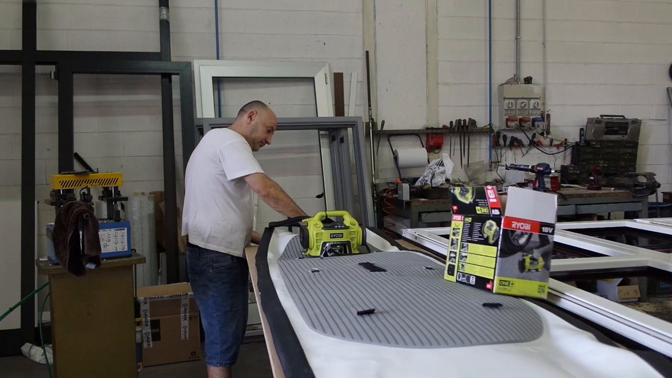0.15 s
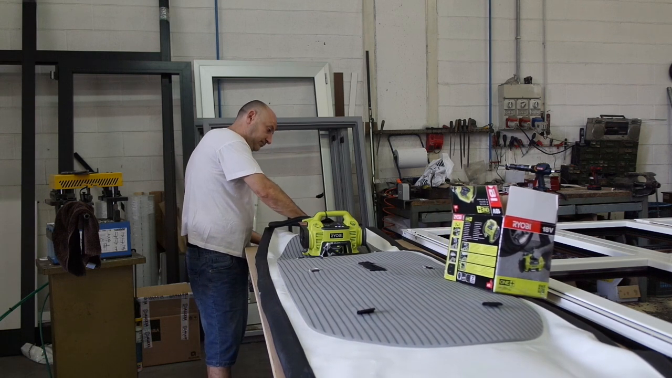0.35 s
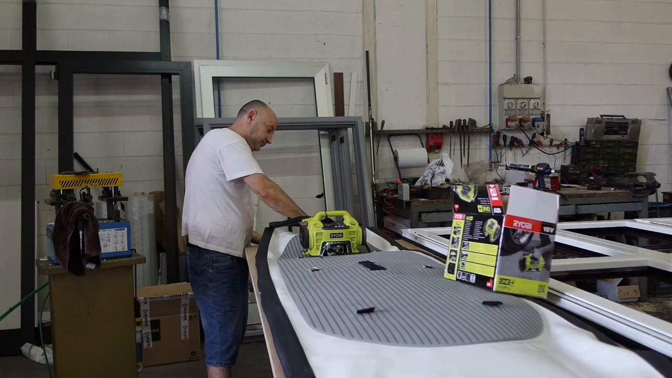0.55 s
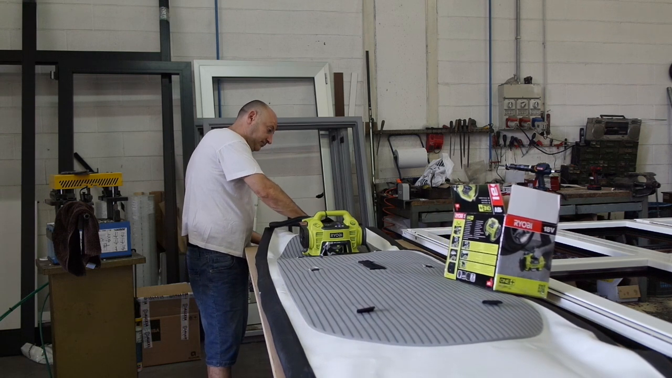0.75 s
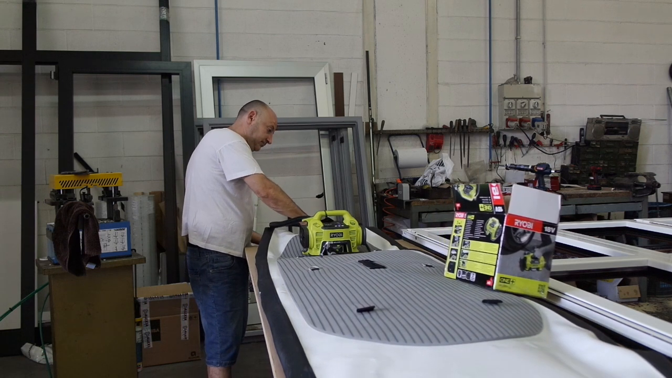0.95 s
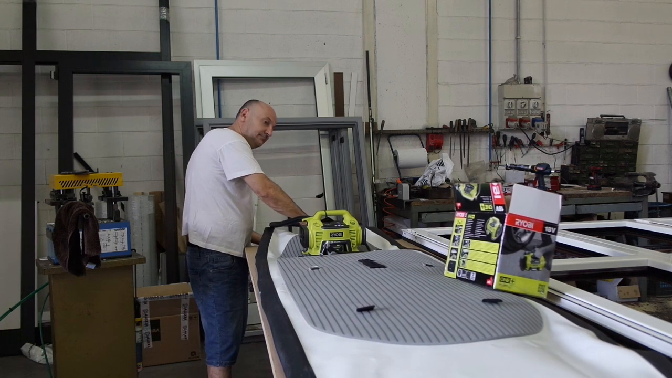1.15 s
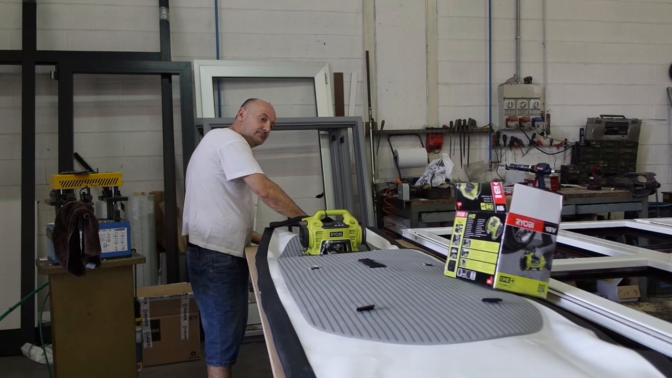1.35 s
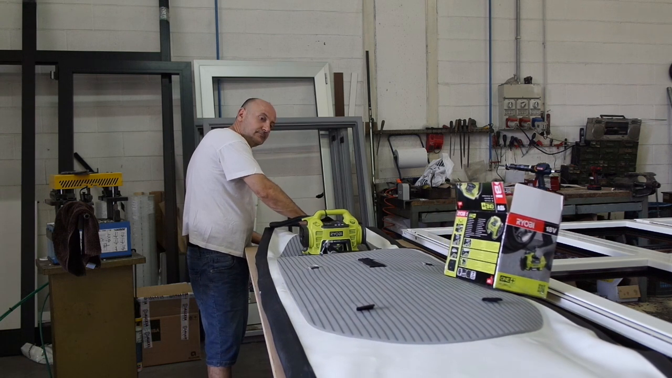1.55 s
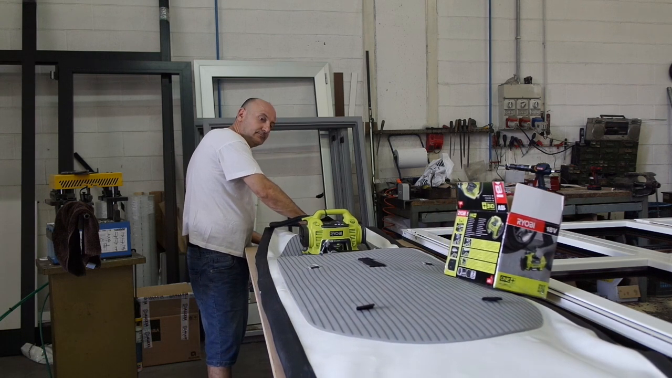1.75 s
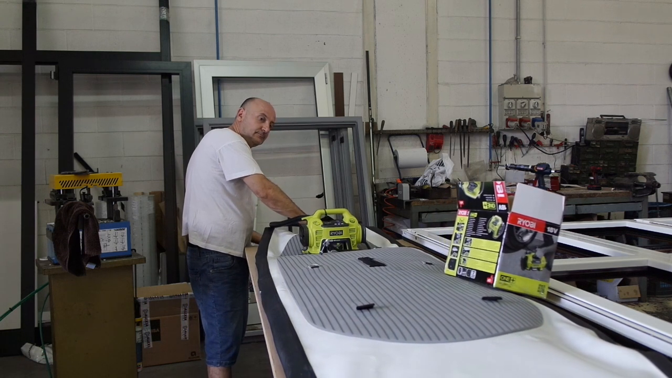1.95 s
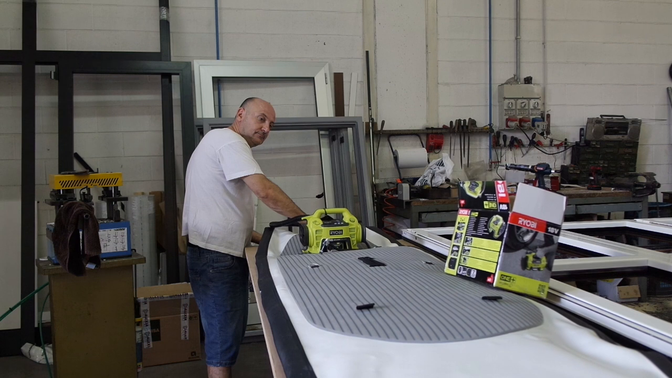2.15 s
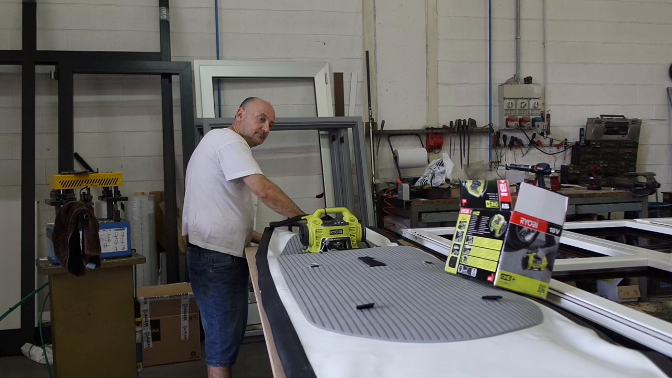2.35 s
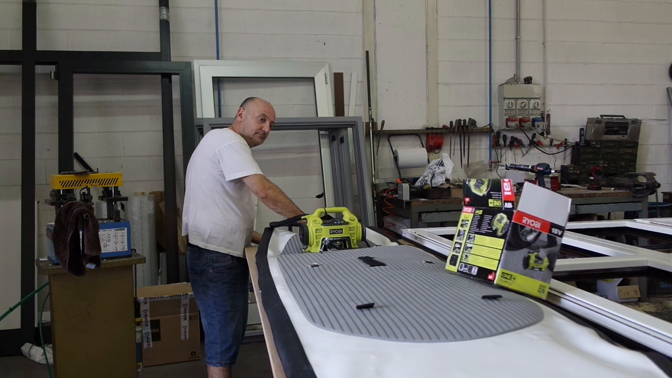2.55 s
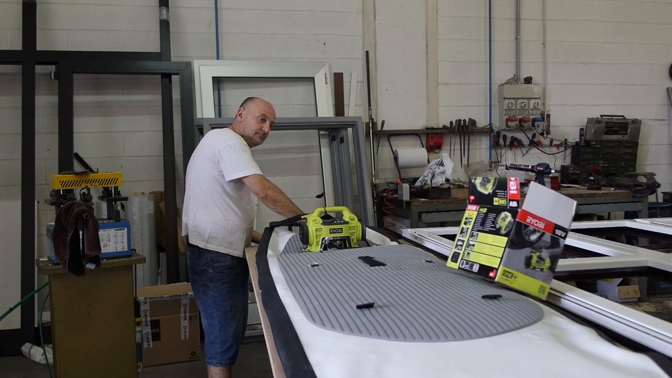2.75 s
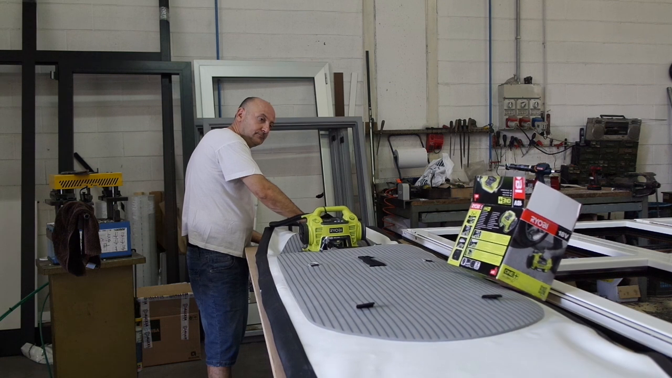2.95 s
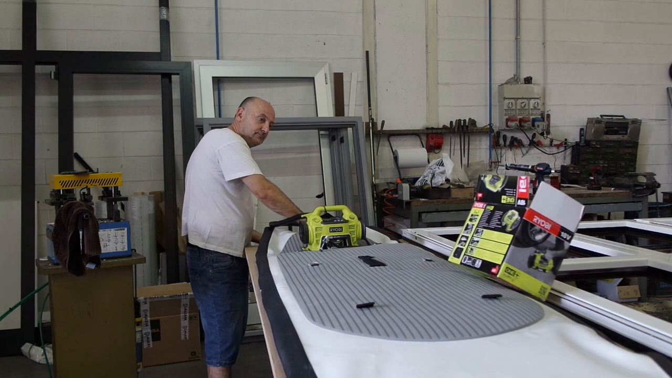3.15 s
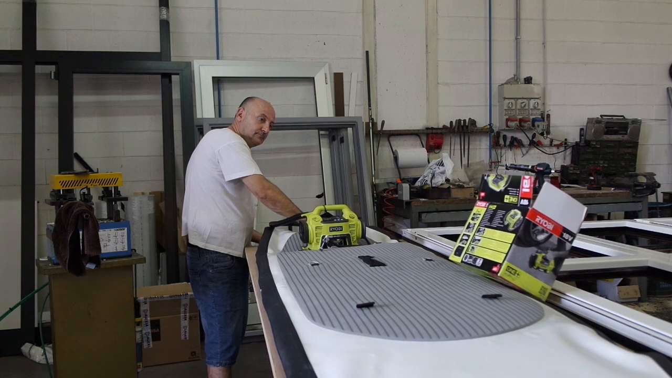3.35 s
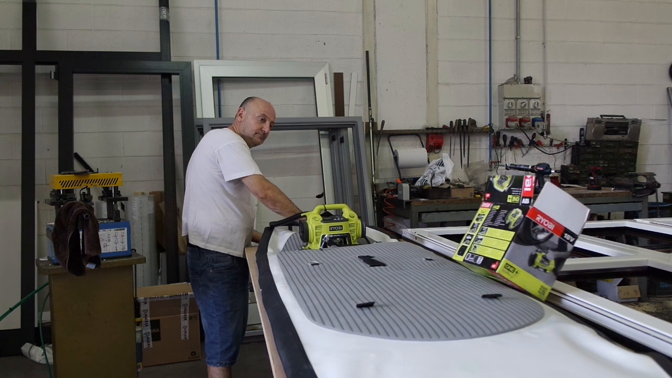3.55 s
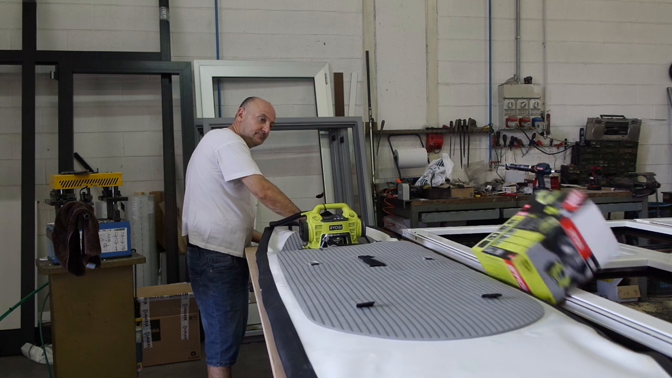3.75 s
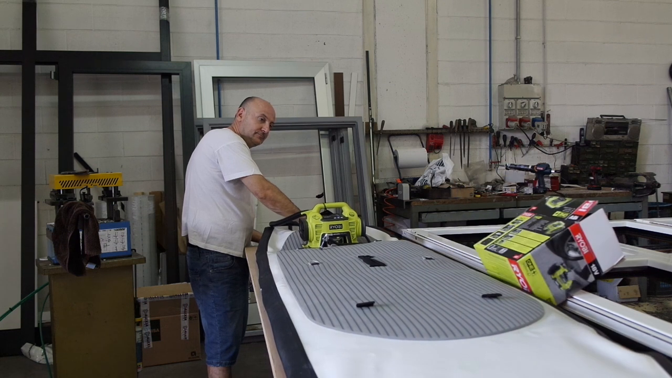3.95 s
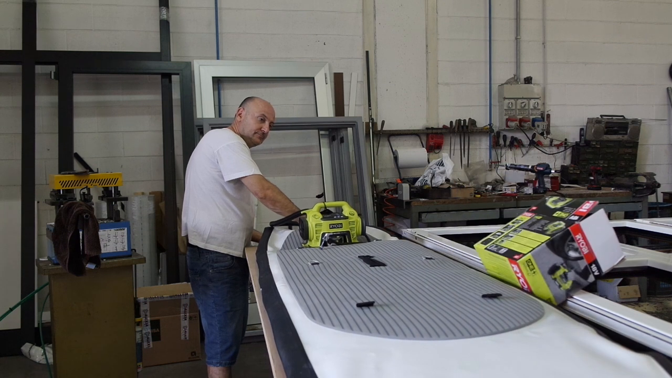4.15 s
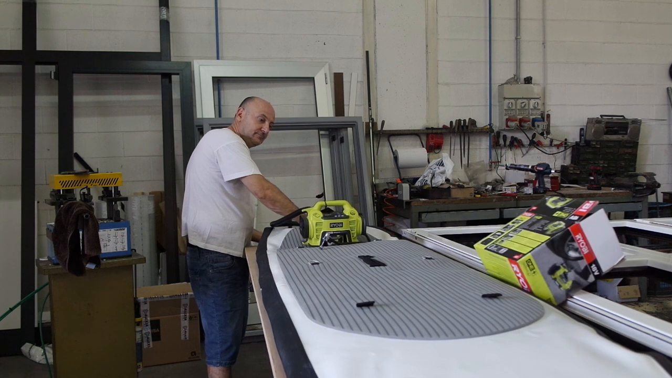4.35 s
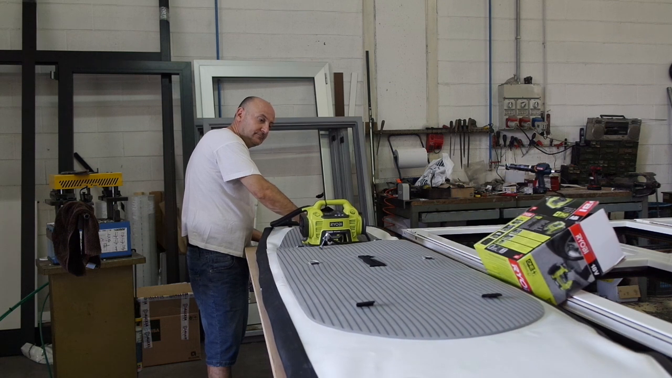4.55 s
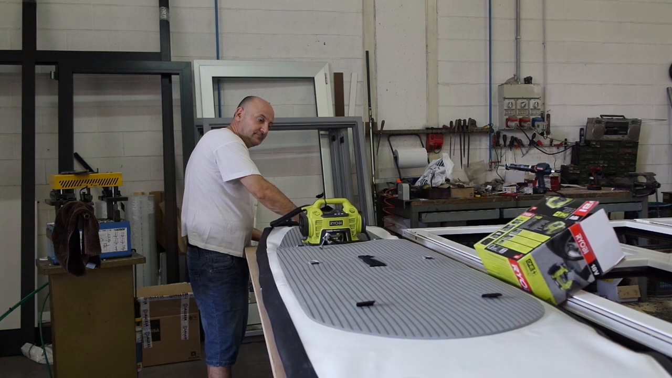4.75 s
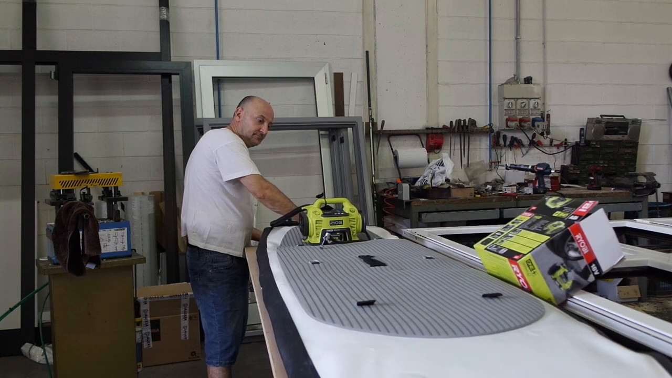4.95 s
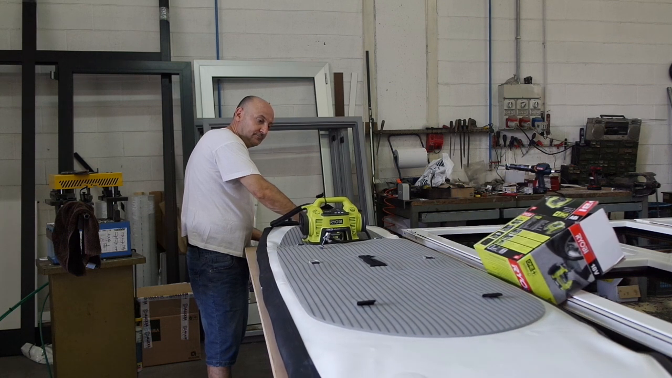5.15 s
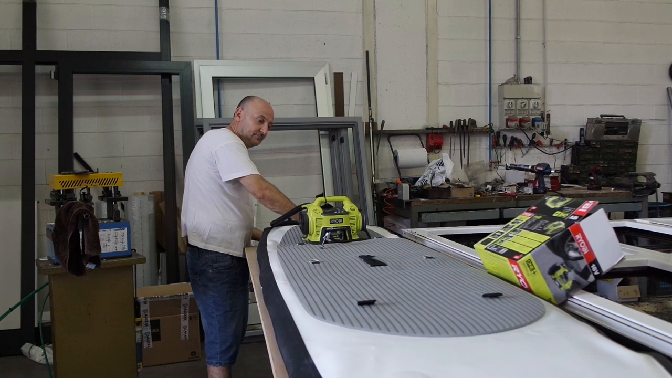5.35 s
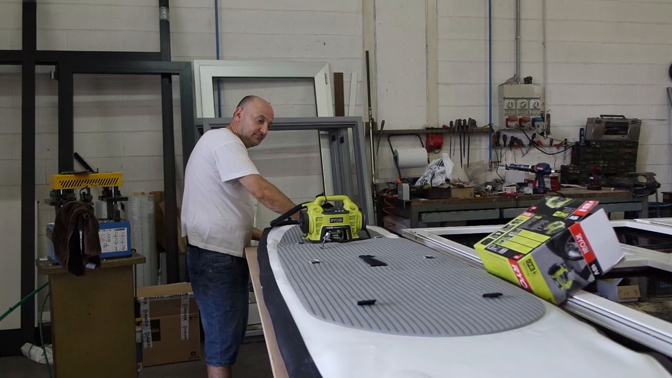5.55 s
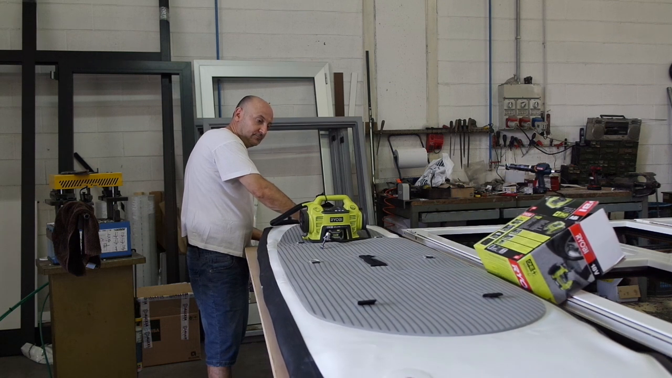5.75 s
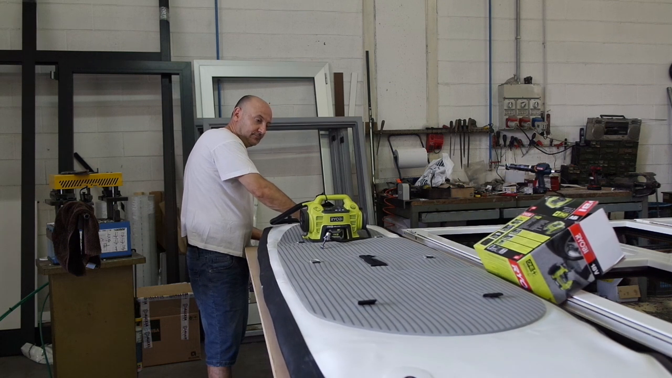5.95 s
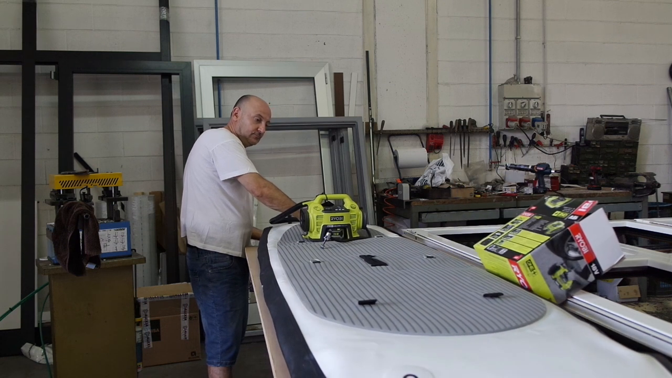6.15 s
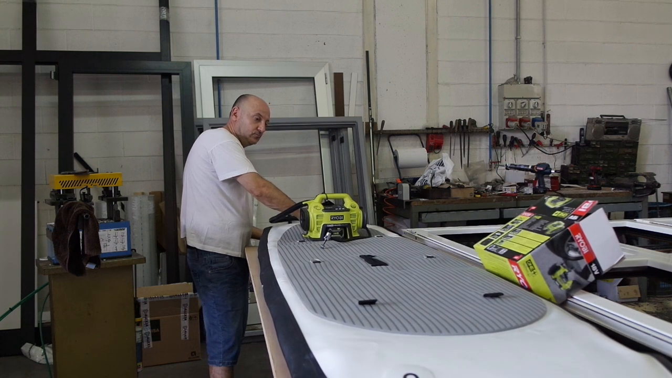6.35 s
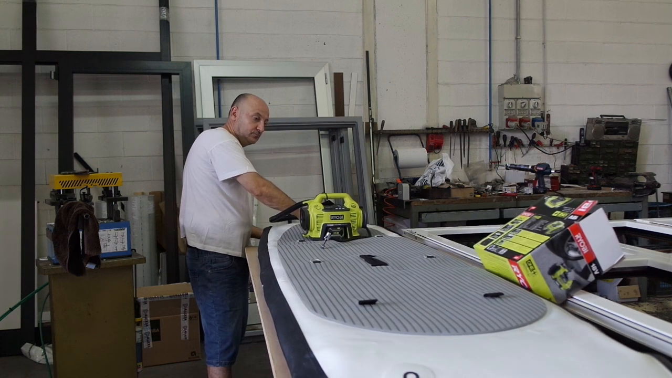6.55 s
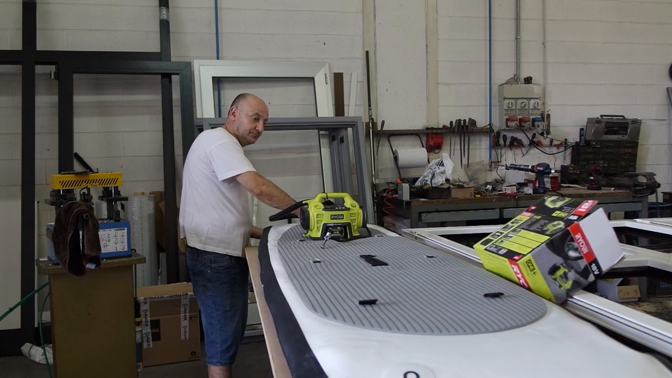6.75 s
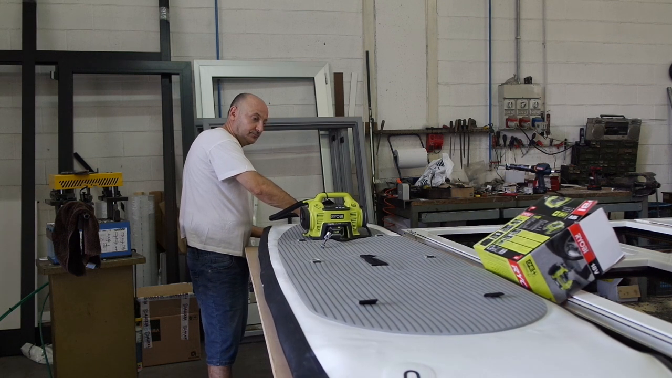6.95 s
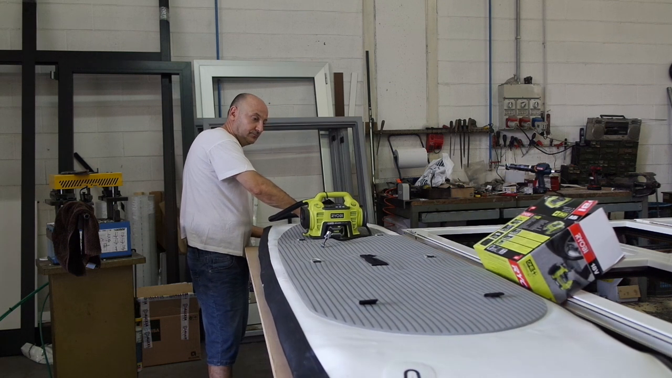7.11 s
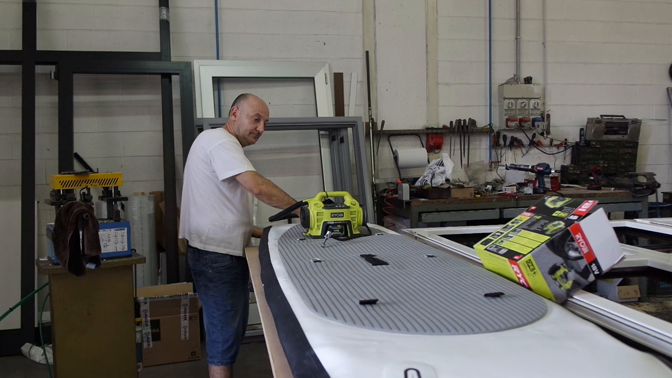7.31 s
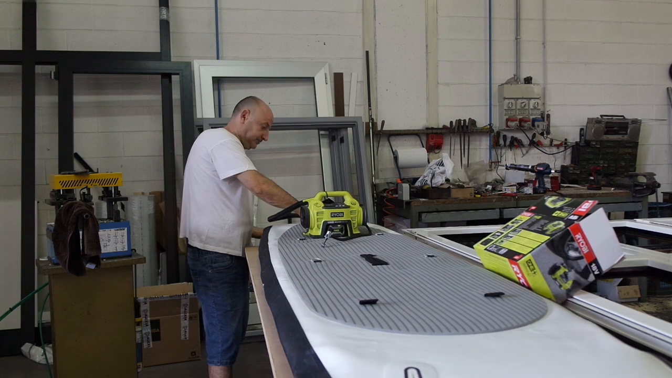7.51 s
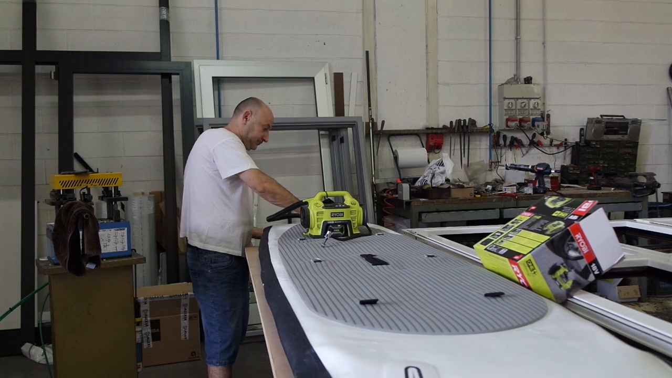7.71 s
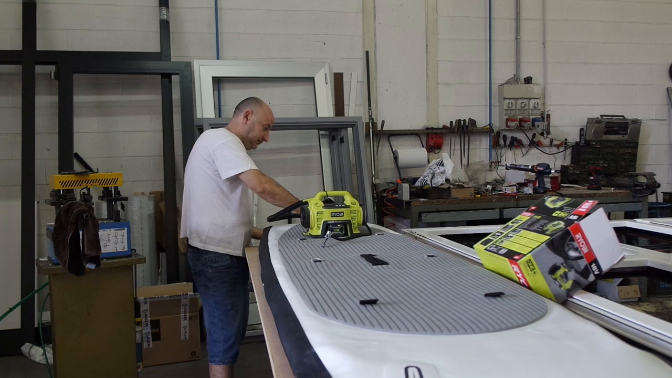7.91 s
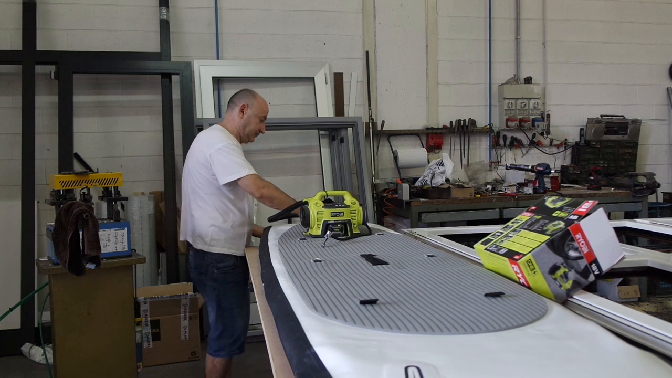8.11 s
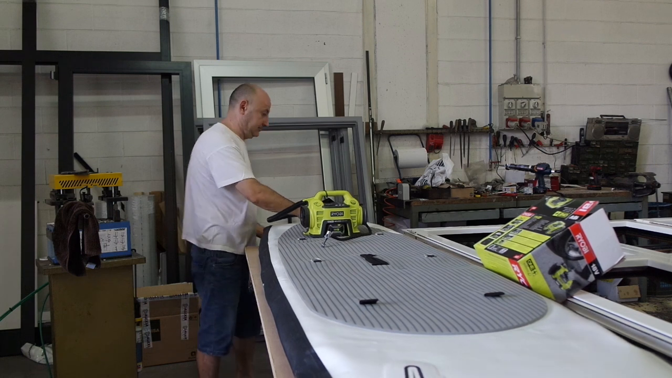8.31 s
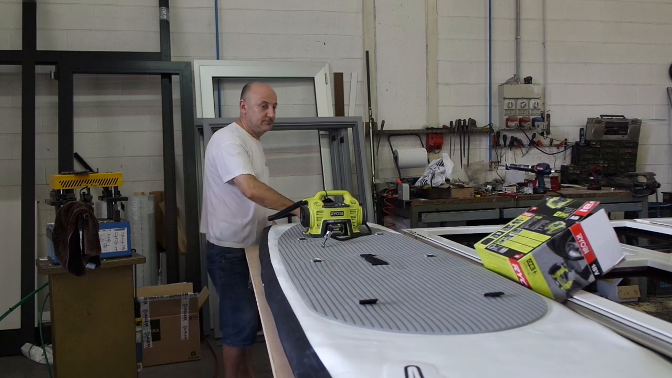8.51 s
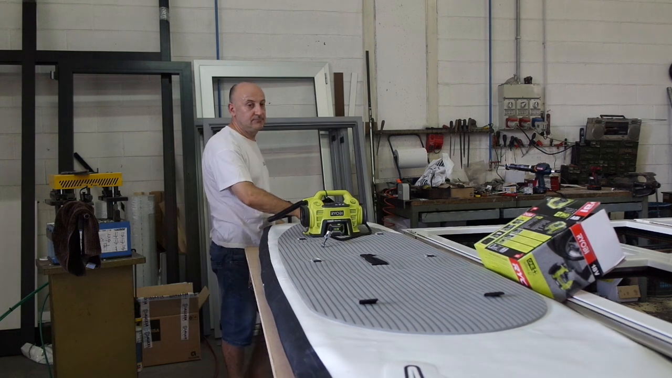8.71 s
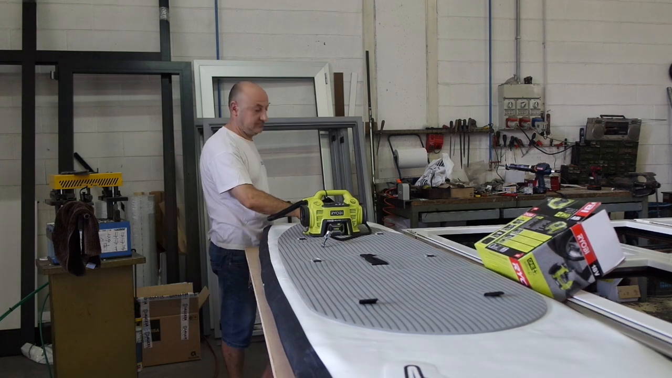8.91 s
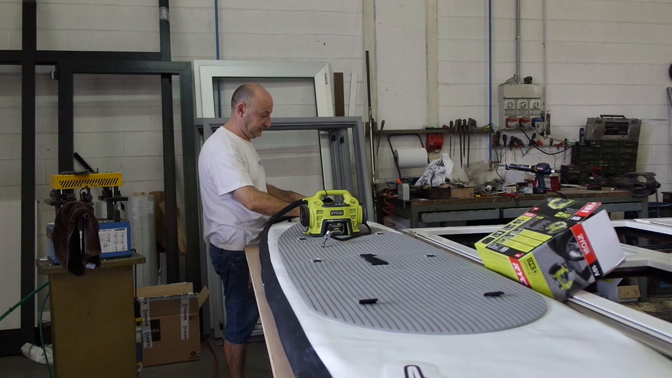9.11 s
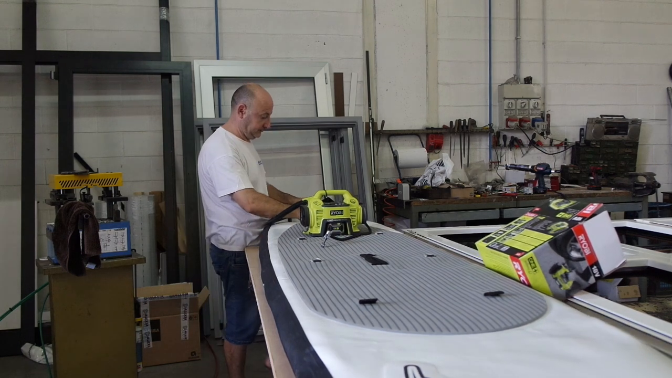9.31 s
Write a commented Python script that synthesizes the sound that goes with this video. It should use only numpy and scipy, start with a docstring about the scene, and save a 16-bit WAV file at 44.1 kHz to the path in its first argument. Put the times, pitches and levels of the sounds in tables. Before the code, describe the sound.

A handheld inflator is already running at full speed, giving a shrill steady whine with several lower and higher tones and a bright rush of air. It flutters in level as it moves in the hand. Around four seconds a light empty carton tips over, slapping and resonating briefly in the hall. The pump continues without stopping, with faint dull hose bumps in the second half. Stereo microphone a few metres away, faint workshop hum behind.

```python
"""A workshop with low rumble and hums; a small battery air pump inflates a paddle board a few metres away.
From the start its eight-bladed impeller whines over the shaft's hum and a rush of turbulent air; the tones
swell and fade as the pump shifts in the hand. Just before 4 s the swelling board tips over an empty cardboard
box: noise slaps, ringing panels and an echo. From nearly 6 s on, the hose knocks softly, as short dull noise."""
import sys
import numpy as np
from scipy import signal
from scipy.fft import rfft, irfft
from scipy.io import wavfile

SR = 44100
rng = np.random.default_rng(int(sys.argv[2]) if len(sys.argv) > 2 else 0)


def generate_wav(signal):
    """Clip the signal to [-1, 1] and save it as 16-bit WAV at the path in sys.argv[1]."""
    frames = np.transpose(np.atleast_2d(signal))
    scaled = np.clip(frames, -1, 1) * 32767
    pcm = np.round(scaled).astype(np.int16)
    wavfile.write(sys.argv[1], SR, pcm)


N = 417627
TIME = np.arange(N) / SR  # seconds
FREQ = np.maximum(np.arange(N // 2 + 1) * SR / N, 1)  # Hz
LEFT_RIGHT = np.array([[1], [-1]])

# Workshop rumble. Each row: frequency in Hz, density in dB per Hz.
SHOP_RUMBLE = [(20, -102), (60, -81), (100, -87), (130, -84.5), (200, -83.5), (330, -85), (800, -100)]
# Workshop hums. Each row: frequency in Hz, level in dB before its waver.
SHOP_HUMS = [(49, -77), (73, -68), (97, -65), (180, -68), (209, -72)]

# Soft knocks of the hose. Each row: start in seconds, relative level in dB.
KNOCKS = [(5.769, -8), (7.029, -7), (8.5, -4), (8.70, -7), (8.725, -11)]
# Colour of a knock. Each row: frequency in Hz, density in dB per Hz before the knock's level.
KNOCK_COLOUR = [(80, -95), (250, -65.5), (550, -64), (1000, -85), (3000, -88)]

# The box lands, on an edge and then flat.
# Each row: start in seconds, relative level in dB, brightness in dB per octave.
LANDINGS = [(3.827, -10, -1.5), (3.886, -4, 2), (3.91, -8.5, -1)]
# Cardboard panels and the air inside. Each row: frequency in Hz, relative level in dB, t60 in seconds.
BOX_MODES = [(210, -9, 0.77), (340, -13, 0.26), (483, -1, 0.31), (603, -6.5, 0.42), (875, -2.5, 0.41),
             (1030, -1.5, 0.23), (1160, -18, 0.18), (1290, -15, 0.33), (1420, -17, .3), (1780, -1, 0.17)]
# Slap of cardboard. Each row: frequency in Hz, density in dB per Hz before the landing's level and tilt.
SLAP_COLOUR = [(40, -100), (110, -66), (220, -60), (400, -49), (1000, -50), (2000, -54), (3000, -57),
               (5000, -90)]
# Echo of the box in the hall. Each row: frequency in Hz, density in dB per Hz before the landing's level.
ECHO_COLOUR = [(60, -89), (140, -70), (400, -66.5), (900, -59.5), (1400, -66.5), (3000, -81)]

# Rushing air. Each row: frequency in Hz, density in dB per Hz before ripple, beaming and gusts.
AIR_COLOUR = [(250, -90.5), (400, -85), (520, -75), (2200, -75), (3300, -71), (4700, -70.5), (5900, -63.5),
              (6900, -69), (8600, -69), (10200, -79), (11500, -75.5), (13500, -85.5), (15600, -80)]
# Stereo width of every noise. Each row: frequency in Hz, side minus mid in dB.
WIDTH = [(100, -4.5), (500, -11), (1500, -20), (3500, -23), (5500, -7), (8000, -7.5), (10000, 0),
         (14000, 1.5)]

# Shaft speed. Each row: time in seconds, turns a second in Hz.
SPEED = [(0, 746.4), (0.25, 744.8), (1.2, 742.8), (3.1, 743.0), (4.8, 742.0), (5.6, 740.8), (7.4, 741.1),
         (7.8, 746.4), (7.95, 746.0), (8.3, 742.8), (9.3, 742.1), (9.47, 744.3)]
# How far the air intake has turned to the front. Each row: time in seconds, share 0 to 1.
TURN = [(0, 0.24), (3.7, 0.02), (5.2, 0.11), (6, 0.9), (8.1, 0.97), (8.58, 0.54), (8.78, 0.7), (9.1, 0.8)]

# Third shaft order, before its waver. Each row: time in seconds, level in dB.
THIRD = [(0.0, -44.6), (0.28, -53), (0.9, -49), (2.98, -53.6), (5.62, -44.5), (6.36, -46.5), (7.14, -43.5),
         (8.32, -57), (8.56, -38), (9.46, -43.0)]
# Sixth shaft order, before its dips. Each row: time in seconds, level in dB.
SIXTH = [(0, -38), (.72, -39), (.93, -50.5), (3.4, -47), (7, -43), (7.3, -38), (9.47, -38)]
# Seventh shaft order, before its dips. Each row: time in seconds, level in dB.
SEVENTH = [(0.0, -41), (0.62, -54), (1.22, -34.4), (2.8, -35), (3.52, -44.2), (3.8, -37.1), (4.96, -44.6),
           (5.64, -34.5), (7.44, -32), (7.56, -53), (7.68, -47), (7.72, -39.5), (9.08, -38), (9.46, -37)]
# Other shaft orders, some of which fade as the third or the sixth swells.
# Each row: multiple of shaft speed, base level in dB, gain when turned to the front in dB,
# share of the third's swing, share of the sixth's swing, left minus right in dB.
ORDERS = [(4, -38.5, 2.3, -0.26, -0.37, -1.5), (5, -38, -10.5, 0.14, 0.11, -0.5),
          (9, -33, -0.5, 0, -0.29, -3), (10, -37.5, 1.5, -0.024, 0.029, 2), (11, -55, 1, 0, 0, 1),
          (12, -49.5, 8.5, 0, -0.099, -7), (13, -54, 2, 0, 0, -2), (15, -54, -12, 0, 0, -3)]
# The orders above the blade tone fade when the pump points away. Each row: time in seconds, gain in dB.
AIM = [(0, -1), (3.1, 1), (3.2, -3), (4.65, -5), (4.8, 0), (7.4, -1), (7.9, -4), (8.3, 0)]
# The hand rests, then shifts its grip and the shaft orders other than the third drop out more.
SHIFT_S, SHIFT_RAMP_S = 7.45, 0.15
REST_DIP_DB, SHIFT_DIP_DB = 0.6, 2.5  # scale of the dips, weighted for each order

# Once-a-turn shaft hum. Each row: time in seconds, level in dB.
HUM = [(0.0, -29.0), (1.18, -36), (1.42, -35), (3.8, -39.5), (3.86, -43), (5.54, -47), (5.7, -54.5),
       (7.64, -51), (7.9, -38.5), (8.08, -50), (8.42, -37.1), (8.98, -47), (9.46, -52)]
# Its octave: base level, share of the hum's swing, gain when turned to the front.
HUM_OCTAVE_DB, HUM_OCTAVE_SHARE, HUM_OCTAVE_TURN_DB = -47.5, 0.58, -7.5

# The blade tone swells and fades as the pump shifts in the hand.
# Each row: time in seconds, level in dB before its waver, left minus right in dB.
WHINE = [(0.0, -28, -0.5), (0.12, -27, -3.7), (0.18, -19, -1.6), (0.26, -23.4, -6.3), (1.1, -21.5, -1.0),
         (1.24, -33, 7), (1.4, -24, 1.4), (1.7, -28, 3.7), (1.86, -20, -1.8), (2.0, -25.9, 0.8),
         (2.16, -21.5, -1.4), (2.46, -25.5, 0.7), (2.98, -25.2, -3.7), (3.08, -20.5, -4.7),
         (3.14, -32.5, -2), (3.44, -27, -1.0), (3.72, -31.5, 2.0), (4.74, -23, -2.2), (5.14, -29.0, -6.3),
         (5.46, -26.5, -2), (5.62, -19.5, -1), (6.84, -17.6, -2.5), (7.7, -20.5, -3.5), (7.74, -29.9, -6.1),
         (7.84, -20.5, -7.7), (8.08, -30.5, -3.8), (8.18, -19.1, -5), (8.54, -24, 2), (8.58, -29, -4),
         (8.88, -18, -3), (9.14, -21.5, -2), (9.46, -24, -2.1)]
# Standing waves between pump and walls skew the blade tone.
# Each row: time in seconds, radians by which left leads when the tone is at its usual level.
LEAD = [(0, 0.99), (3.13, 0.98), (3.17, -.7), (3.8, -0.53), (4.7, -0.28)]
BLADES = 8
# In a dip the reflections take over: skew and waver grow by DIP_SHARE dB for each dB below the usual level.
WHINE_USUAL_DB, DIP_SHARE, WAVER_DB = -27, 1, 0.98
# Octave of the blade tone: base level, gain when turned to the front, waver, mean skew in radians.
OCTAVE_DB, OCTAVE_TURN_DB, OCTAVE_WAVER_DB, OCTAVE_LEAD = -47, 3, 2.5, 1.97

TOP_HZ = 15750  # upper limit of the recorder


def undb(db):
    """Decibels to gain."""
    return 10 ** (np.asarray(db) / 20)


def curves(table):
    """Each column of a timed table, sample by sample."""
    s, *columns = np.transpose(table)
    return [np.interp(TIME, s, column) for column in columns]


def fading(table):
    """Level in dB of a tone among standing waves: pressure moves evenly, so swells are round and dips sharp."""
    s, db = np.transpose(table)[:2]
    return 20 * np.log10(np.interp(TIME, s, undb(db)))


def colour(points):
    """Gain at every frequency from (Hz, dB) points."""
    hz, db = np.transpose(points)
    return undb(np.interp(np.log(FREQ), np.log(hz), db))


def walk(rate):
    """Smooth chance with spread near 1, its motion weakening above rate Hz."""
    count = N // 63  # drawn coarsely, then interpolated
    spectrum = rfft(rng.standard_normal(count))
    slow = irfft(spectrum / (1 + (FREQ[:count // 2 + 1] / rate) ** 2))
    return np.interp(TIME, np.linspace(0, TIME[-1], len(slow)), slow / slow.std())


def noise(gain):
    """Stereo noise of a given density; the treble differs most between left and right."""
    mid, side = rfft(rng.standard_normal((2, N))) * gain * np.sqrt(SR / 2)
    return irfft(mid + LEFT_RIGHT * side * colour(WIDTH), N)


def fade(start, t60):
    """Envelope that starts at a blow and loses 60 dB in t60 seconds."""
    decay = np.log(1000) * np.abs(TIME - start) / t60
    return (TIME >= start) * np.exp(-np.minimum(decay, 20))


def tone(phase, db, pan_db, lead, flutter):
    """A line shaken by turbulence, with its own level and phase at each side."""
    shaken = 1 + flutter * (walk(14) + 1j * walk(22))
    phase = phase + rng.uniform(0, 2 * np.pi) + np.angle(shaken)
    gain = np.sqrt(2) * np.abs(shaken) * undb(db + LEFT_RIGHT * pan_db / 2)
    return gain * np.cos(phase + LEFT_RIGHT * lead / 2)


def workshop():
    """Background of the hall: low rumble as shaped noise, and sines wavering in phase and level."""
    out = noise(colour(SHOP_RUMBLE))
    for hz, db in SHOP_HUMS:
        sine = np.sin(2 * np.pi * hz * TIME + 1.6 * walk(2.7))
        out = out + undb(db) * np.sqrt(2) * sine * (1 + 0.45 * walk(4.2))
    return out


def hose():
    """Dull, short knocks of the hose under the hand: low noise that dies away after each blow."""
    blows = sum(undb(db) * fade(start, 0.23) for start, db in KNOCKS)
    return noise(colour(KNOCK_COLOUR)) * blows


def box():
    """Each landing slaps the cardboard and rings its panels; the hall answers."""
    slap = rfft(noise(colour(SLAP_COLOUR) / (1 + (90 / FREQ) ** 4)))  # little below 90 Hz
    hall = noise(colour(ECHO_COLOUR))
    out = 0
    for start, db, tilt_db in LANDINGS:
        crack = irfft(slap * undb(tilt_db * np.log2(FREQ / 700)), N)
        crack = crack * (0.41 * fade(start, 0.044) + 0.66 * fade(start, 0.097))
        ring = 0
        for hz, mode_db, t60 in BOX_MODES:
            mode = np.sin(2 * np.pi * (hz * TIME + rng.random()))
            ring = ring + undb(mode_db) * fade(start, t60) * mode
        echo = hall * fade(start + 0.006, 0.74)
        out = out + undb(db) * (crack + undb(-24) * ring + echo)
    return out


def air(shaft, speed_hz, turn):
    """Turbulence in the housing, louder with speed, chopped once a turn and rippled by nearby surfaces."""
    lag_s = rng.uniform(0.00197, 0.02, 12)  # twelve reflections
    reflections = np.exp(-2j * np.pi * lag_s[:, None] * FREQ).sum(axis=0)
    ripple = np.abs(1 + 0.081 * reflections)
    rush = noise(colour(AIR_COLOUR) * ripple)
    # the intake beams its hiss around 7 kHz, to the right
    hiss = irfft(rfft(rush) * np.exp(-np.log(FREQ / 7000) ** 2 / 0.053), N)
    beam_db = 1.9 * turn - 0.2 - LEFT_RIGHT * 2.9 + 0.24 * walk(4.8)
    rush = rush + hiss * (undb(beam_db) - 1)
    chop = 1 + 0.042 * np.cos(shaft)
    gust_db = 0.22 * (speed_hz - speed_hz.mean()) + 0.38 * walk(9.8) - 0.5
    return rush * chop * undb(gust_db)


def side_tones(shaft, turn):
    """Shaft orders that unequal blades set around the blade tone; the third wavers, the others dip briefly."""
    third_db, seventh_db = fading(THIRD), fading(SEVENTH)
    sixth_db, aim_db = curves(SIXTH) + curves(AIM)
    dip_db = np.interp(TIME, [SHIFT_S, SHIFT_S + SHIFT_RAMP_S], [REST_DIP_DB, SHIFT_DIP_DB])
    third_swing_db, sixth_swing_db = third_db - third_db.mean(), sixth_db - sixth_db.mean()

    out = tone(3 * shaft, third_db + 0.95 * walk(3.1), -1.5 + 1.6 * walk(0.8), 0.28 * walk(1), flutter=0.12)
    sixth_db = sixth_db - 0.37 * dip_db * (walk(2.8) ** 2 - 1)
    out += tone(6 * shaft, sixth_db, -1.3, 0, flutter=0.097)
    seventh_db = seventh_db - 0.68 * dip_db * (walk(3.3) ** 2 - 1)
    out += tone(7 * shaft, seventh_db, -4.0, 0.15 * walk(1), flutter=0.075)

    for order, level_db, turned_db, third_share, sixth_share, pan_db in ORDERS:
        order = round(order)
        db = level_db + turn * turned_db + (order > BLADES) * aim_db
        db = db + third_share * third_swing_db + sixth_share * sixth_swing_db
        short = order / BLADES  # short waves fade and skew more as the pump moves
        db = db - short ** 2 * dip_db * walk(2.5) ** 2
        out += tone(order * shaft, db, pan_db, 0.12 * short * walk(1.0), flutter=0.094)
    return out


def shaft_hum(shaft, turn):
    """The once-a-turn hum of the rotor and its octave, which follows part of the hum's swing."""
    db = fading(HUM)
    octave_db = HUM_OCTAVE_DB + HUM_OCTAVE_SHARE * (db - db.mean()) + HUM_OCTAVE_TURN_DB * turn
    hum = tone(shaft, db, -1.3 + 0.35 * walk(1), 0.2 * walk(1), flutter=0.03)
    return hum + tone(2 * shaft, octave_db, 0, 0, flutter=0.094)


def blade_tone(shaft, turn):
    """The whine of the passing blades and its octave; the whine is least steady where it fades."""
    db, pan_db = fading(WHINE), curves(WHINE)[1]
    lead, = curves(LEAD)
    unsteady = undb(-DIP_SHARE * (db - WHINE_USUAL_DB))
    wavering_db = db + WAVER_DB * unsteady * walk(8.8)
    whine = tone(BLADES * shaft, wavering_db, pan_db, lead * unsteady, flutter=0.023)
    octave_db = OCTAVE_DB + OCTAVE_TURN_DB * turn + OCTAVE_WAVER_DB * walk(4.4)
    octave_pan_db = 3 + 6.3 * walk(1.5)
    octave_lead = OCTAVE_LEAD + 0.5 * walk(2)
    return whine + tone(2 * BLADES * shaft, octave_db, octave_pan_db, octave_lead, flutter=0.16)


def impeller(shaft, turn):
    """All tones of the pump, whole multiples of one shaft rotation."""
    return side_tones(shaft, turn) + shaft_hum(shaft, turn) + blade_tone(shaft, turn)


def scene():
    """The workshop, hose and box around the pump, where one shaft drives the tones and the air."""
    speed_hz, turn = curves(SPEED) + curves(TURN)
    shaft = 2 * np.pi * np.cumsum(speed_hz + 0.026 * walk(6.2)) / SR  # angle in radians
    return workshop() + hose() + box() + air(shaft, speed_hz, turn) + impeller(shaft, turn)


def record(dry):
    """The recorder cuts the top with a steep low-pass filter."""
    low_pass = signal.ellip(10, 0.2, 80, TOP_HZ, fs=SR, output="sos")
    return signal.sosfilt(low_pass, dry)


dry = scene()
out = record(dry)
generate_wav(out)
```